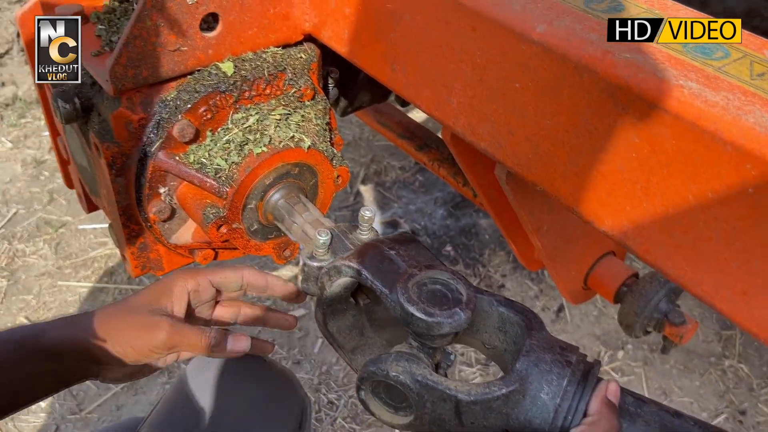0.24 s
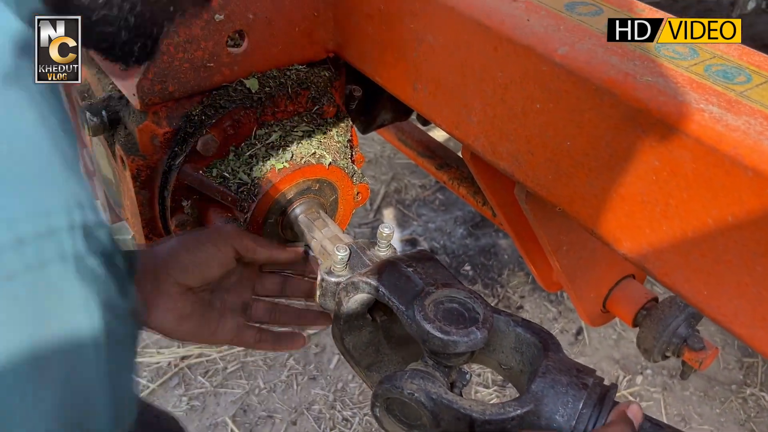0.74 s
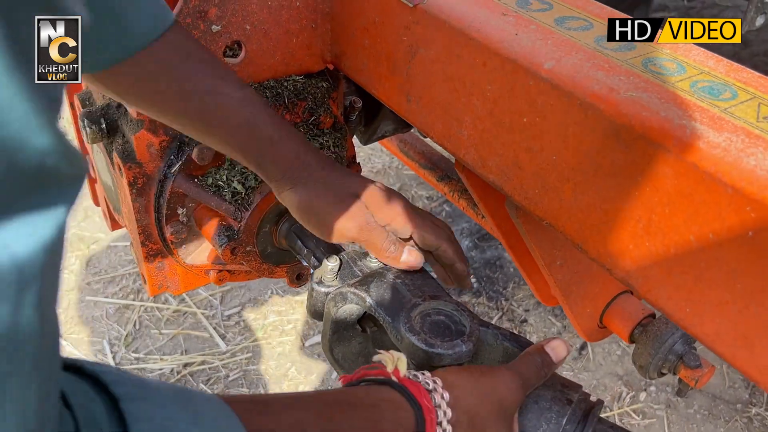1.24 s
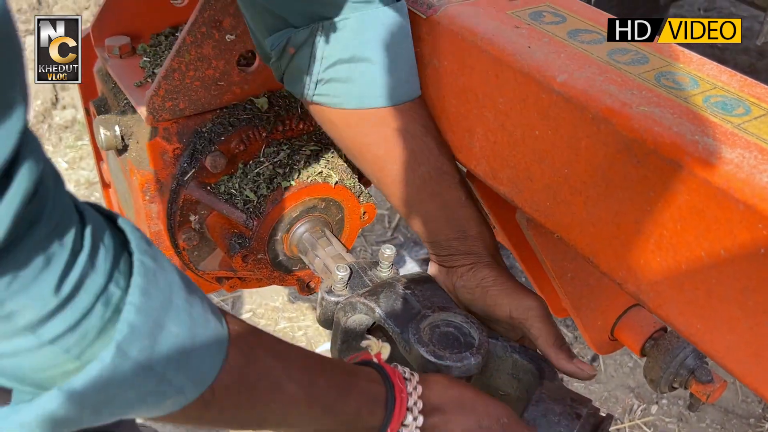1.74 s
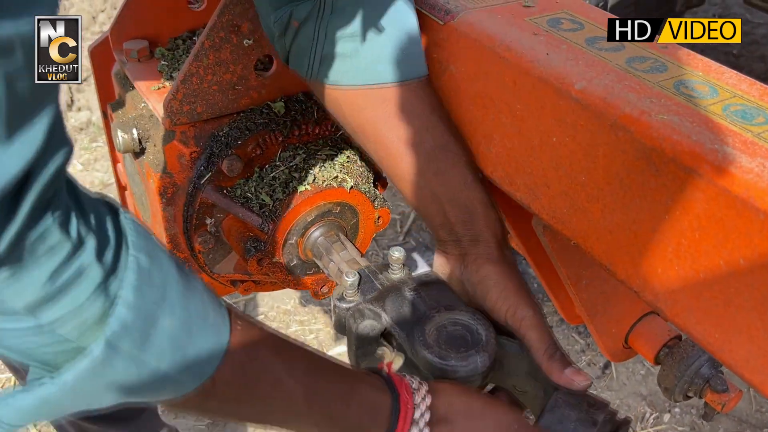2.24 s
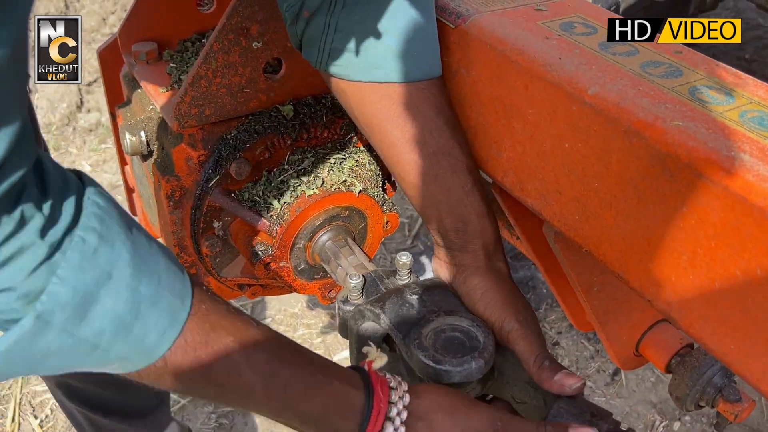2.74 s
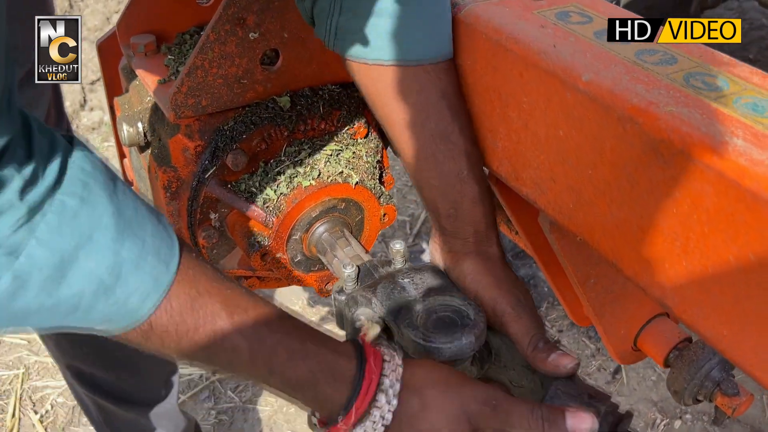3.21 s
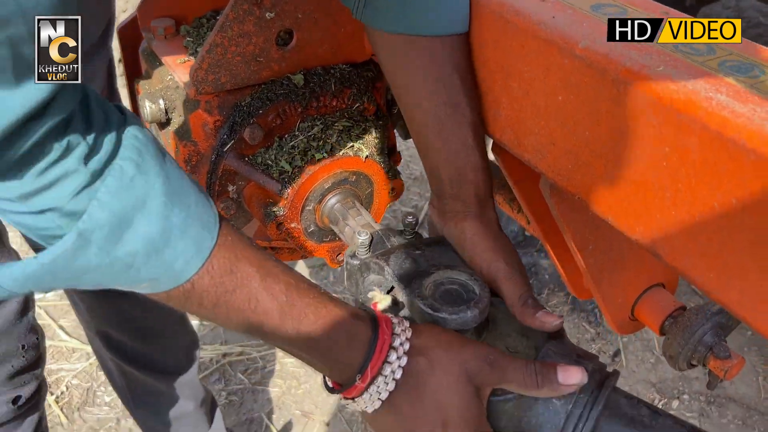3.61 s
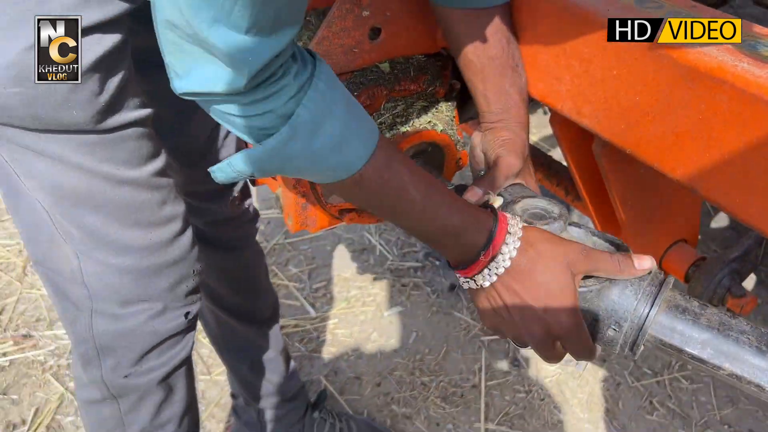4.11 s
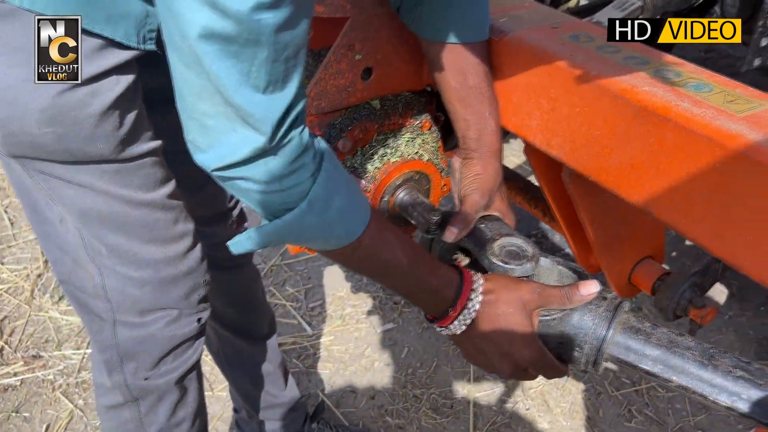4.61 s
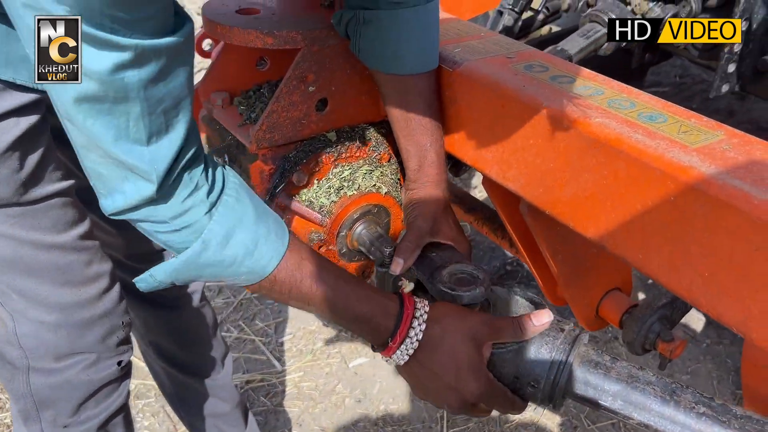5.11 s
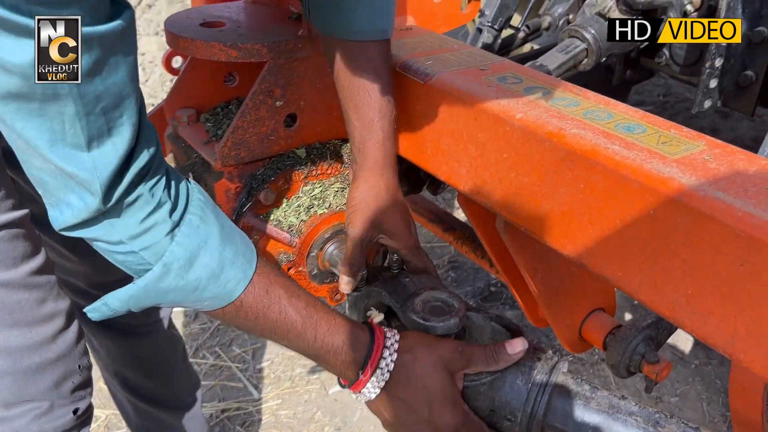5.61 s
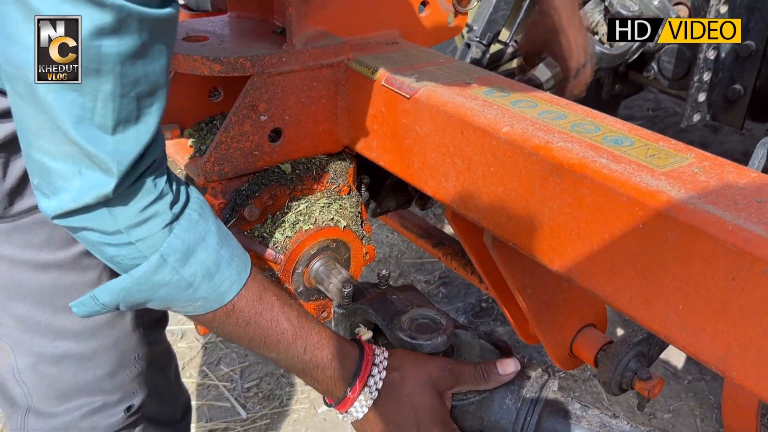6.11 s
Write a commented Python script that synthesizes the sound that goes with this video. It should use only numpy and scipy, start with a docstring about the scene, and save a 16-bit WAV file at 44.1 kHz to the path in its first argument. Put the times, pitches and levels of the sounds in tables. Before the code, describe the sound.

Close up outdoors, a heavy steel coupling is worked onto a machine's shaft. Two early clanks and a rasp come first, then cloth brushes the microphone and a shoe scuffs dry dirt. From just past two seconds, dense clanks, scrapes and rattles follow, with a dull frame boom and short tube ring. They thin out to separate knocks, and wind thumps grow at the end.

```python
"""Steel yoke on a splined shaft

A heavy drive-shaft yoke is jiggled onto a farm machine's splined input shaft, outdoors and close up.
Each contact is a short dead clank of noise and damped modes; the machine's frame hums and the hollow shaft sings.
Between clanks, clumped noise makes the splines scrape, and random clicks make them rattle.
Shaped noise gives rustling clothes, cloth brushing the microphone, a shoe scuffing dirt and thumping wind.
"""
import sys
import numpy as np
from scipy import signal
from scipy.fft import rfft, irfft, next_fast_len
from scipy.io import wavfile
from scipy.ndimage import map_coordinates

SR = 44100
rng = np.random.default_rng(int(sys.argv[2]) if len(sys.argv) > 2 else 0)


def pcm_store(signal):
    """Save signal as 16-bit PCM."""
    levels = np.round(np.clip(np.atleast_2d(signal), -1, 1) * 32767)
    wavfile.write(sys.argv[1], SR, levels.astype(np.int16).T)


N = 280035

# slowly changing breeze under the gusts [t/s, level/dB]
BREEZE_LEVEL = [(0.0, -44.5), (1.22, -49.5), (1.73, -58), (3.48, -45), (4.16, -48.5), (4.47, -44.5),
                (5.02, -44.5), (5.43, -40), (5.64, -43), (6.35, -35.5)]
# gusts riding on the breeze [t/s, length/s, level/dB]
GUST_SWELLS = [(.17, 0.16, -43), (.8, 0.088, -41.5), (1.06, 0.22, -44), (1.45, 0.21, -49.5),
               (2.36, 0.066, -37.5), (2.57, .11, -47.5), (3.08, 0.062, -44.5), (3.3, 0.092, -41),
               (3.62, 0.14, -48), (4.24, 0.065, -42), (4.41, 0.075, -40.5), (4.55, 0.16, -35.5),
               (5.15, 0.059, -38), (5.28, 0.063, -33), (5.43, 0.28, -37.5), (5.99, 0.071, -31.5),
               (6.16, 0.1, -35.5)]
# single puffs of air on the microphone [t/s, peak level/dB, f/Hz]
AIR_PUFFS = [(0.832, -24.5, 290), (1.117, -29, 265), (5.29, -23.5, 67), (5.312, -23.5, 75.8),
             (5.447, -22, 90), (6.025, -15, 128), (6.055, -25, 183), (6.081, -17.5, 81), (6.214, -27, 293),
             (6.229, -11.5, 74), (6.274, -16.5, 94)]
# colour of the wind eddies [f/Hz, relative level/dB]
WIND_COLOUR = [(12, -40), (20, -20), (50, 2.5), (81, 2.5), (123, -1), (215, -10.5), (357, -25.5),
               (433, -36.5), (476, -32.5), (743, -59), (900, -59.5), (1170, -78), (1980, -120)]
# colour of the quiet open air [f/Hz, relative level/dB]
AIR_COLOUR = [(12, -44), (20, -6.5), (59, -2), (157, -9), (342, -13), (465, -27), (534, -18.5),
              (767, -26.5), (5380, -52.5), (7310, -54), (9930, -53), (12800, -49.5), (15500, -64)]
EDDY_DB, GUSTY_DB, GUSTS_PER_S = -0.5, 1, 14  # eddy gain; depth and rate (knots per s) of their swells

# the worker's movements rustle a shirt [t/s, length/s, level/dB]
SHIRT_MOVES = [(.83, 0.23, -75.5), (1.0, 0.56, -84.5), (1.38, 0.76, -72), (2.22, 0.14, -58.5),
               (2.38, 0.5, -72), (3.42, 0.1, -68.5), (3.65, 0.42, -73.5), (4.12, 0.096, -60),
               (4.24, 0.13, -76), (4.97, 0.12, -74), (5.5, .42, -87), (5.95, 0.25, -75.5)]
# cloth brushes the microphone [t/s, length/s, level/dB]
CLOTH_BRUSHES = [(.2, 0.33, -41.5), (.795, 0.083, -42), (.96, 0.023, -36), (1.025, .12, -35),
                 (1.21, 0.072, -44.5), (1.5, 0.12, -52.5)]
# colour of rustling cloth [f/Hz, relative level/dB]
CLOTH_COLOUR = [(350, -56.5), (600, -10), (788, -6.5), (1470, -6), (2470, -8), (2950, -10), (6950, -18.5),
                (8520, -17), (9890, -36.5), (11300, -20.5), (13200, -22), (14500, -22), (15500, -71.5)]
# colour of cloth brushing lightly [f/Hz, relative level/dB]
BRUSH_COLOUR = [(40, -32), (70, -6), (150, 4.5), (260, -3.5), (500, -10), (800, -53.5), (1400, -60.5),
                (4000, -120)]
# colour added by firm brushing [f/Hz, relative level/dB]
FLUTTER_COLOUR = [(100, -14.5), (250, 1), (450, 1.5), (700, -6.5), (950, -27), (1400, -47.5), (4000, -110)]
STILL_DB = -87  # shirt between movements, ahead of the rustle's own gain

# sliding strokes of steel on steel, after a faint opening rustle [t/s, length/s, level/dB]
SLIDE_STROKES = [(0.0, 0.029, -53.5), (.155, 0.049, -37.5), (2.18, 0.14, -46), (2.26, 0.16, -43.5),
                 (2.47, 0.069, -50.5), (2.735, 0.039, -37.5), (3.41, 0.092, -42.5), (3.645, 0.037, -43),
                 (3.79, 0.063, -51), (3.845, 0.0562, -43.5), (4.475, 0.088, -50.5), (4.745, 0.027, -43.5),
                 (4.865, 0.033, -58), (5.405, 0.079, -40.5), (5.58, 0.079, -41), (5.96, 0.031, -60.5)]
# colour of steel scraping [f/Hz, relative level/dB]
SCRAPE_COLOUR = [(150, -23), (350, -0.5), (560, 3), (900, -2.5), (1500, -1.5), (2400, -5), (4000, -20.5),
                 (7500, -34.5), (9900, -52.5), (11500, -40.5), (14000, -42.5), (15500, -67)]
# yoke modes, damped by hands and grease [f/Hz, level/dB, t60/s]
YOKE_MODES = [(900, 6.5, 0.089), (1215, 3, 0.1), (1392, 0, 0.12), (1660, -8, 0.053), (1790, -4.5, 0.16),
              (2154, -5.5, .13), (2384, -7, .13), (2676, -6, .09), (3130, -14.5, 0.15), (3440, -15, 0.098),
              (3780, 2.5, 0.053), (3951, -5, .07), (4620, -16, 0.1), (5070, -18.5, .06), (5720, -12, .08),
              (6230, -14.5, 0.043), (6510, -13.5, 0.058), (7300, -16, 0.096), (7420, -13, 0.08),
              (7630, -19, 0.076), (8800, -26, 0.07), (11720, -21, .08), (13710, -34, .06)]
# sliding strokes of shoes and cloth [t/s, length/s, level/dB]
SHOE_SCUFFS = [(.84, .1, -51), (1.385, 0.095, -46), (1.45, 0.11, -45), (1.985, 0.033, -49),
               (2.03, 0.086, -57), (4.97, 0.056, -76), (5.04, 0.077, -72)]
# colour of a sole on dry soil [f/Hz, relative level/dB]
DIRT_COLOUR = [(150, -1.5), (500, -2), (1400, -3), (2500, -8), (4500, -21), (7500, -24.5), (9900, -41),
               (12000, -36), (14000, -40), (15500, -57)]
# clicks while something slides: rate, level relative to the stroke, scatter of that level
RATTLE_PER_S, RATTLE_DB, RATTLE_SCATTER_DB = 29, -11, 10

# yoke meets shaft [t/s, clank level/dB at 2-6 kHz, knock relative to clank/dB, edge relative to clank/dB]
YOKE_CONTACTS = [(0.1446, -49.5, 4.5, -20), (.167, -37, -5, -18.5), (0.227, -52.5, 5.5, -35),
                 (.333, -62.5, 13, -41), (.403, -30.5, -1.5, -29.5), (0.999, -66.5, -4, -16),
                 (2.236, -58.5, 2, -44), (2.2796, -40, 3, -69), (2.3767, -36.5, -1, -18.5),
                 (2.567, -33.5, 5.5, -22.5), (2.747, -38.5, 7, -45), (2.8181, -27.5, -5.5, -38),
                 (2.828, -45.5, 5.5, -14), (3.0561, -31, -3, -41), (3.2076, -52.5, 3.5, -23),
                 (3.234, -45.5, 5, -26), (3.242, -38.5, -0.5, -24.5), (3.251, -40, 1, -28),
                 (3.283, -51.5, 6.5, -38), (3.438, -47, -7, -33), (3.465, -46.5, 2, -38),
                 (3.638, -48.5, 1.5, -20), (3.665, -41, 3, -19.5), (3.681, -39, 0, -25),
                 (3.712, -45.5, 0.5, -22), (3.7225, -35, -1, -21.5), (3.824, -48.5, -0.5, -33),
                 (3.849, -48, -0.5, -32), (3.8666, -38.5, -5, -24.5), (3.9891, -49, -5, -25),
                 (4.021, -56, 8.5, -16), (4.257, -66, 8.5, -8.5), (4.5094, -42.5, 4.5, -39),
                 (4.5664, -29, -3, -15), (4.7711, -29.5, -6, -32), (5.3737, -57, 2, -22),
                 (5.3937, -40, -0.5, -18.5), (5.425, -44, 4, -46), (5.5476, -58, 7, -20),
                 (5.5769, -52.5, 0, -33), (5.655, -41, -3.5, -20), (5.7972, -63, 4.5, -18),
                 (5.8666, -62, 3.5, -25), (6.141, -61.5, -1.5, -12), (6.2577, -67.5, 8, -12)]
# colour of the dense clank [f/Hz, relative level/dB]
CLANK_COLOUR = [(100, -15), (400, 1.5), (1300, 7), (3000, -7), (4000, -4), (5500, -9.5), (7400, -15),
                (8300, -24), (9800, -33), (11500, -27.5), (14300, -28.5), (15800, -44.5)]
FIRM_DB = -40  # clank level of a firm contact
CHATTER_S, CHATTER_SPREAD = 0.001, 0.34  # usual rebound time; its scatter in octaves
BRIGHTER = 0.048  # harder blows lean towards the top of the clank: dB of tilt per dB

# gearbox and frame modes [f/Hz, level/dB, t60/s]
FRAME_MODES = [(198, -6, 0.12), (254.5, -3.5, 0.51), (277, -2.5, 0.91), (330, 5, 0.4), (417.7, -15.5, 0.93),
               (528.4, -9, 0.45), (601.4, -8, 0.49), (694, -25, 0.25), (833, -16.5, 0.39),
               (867, -22.5, 0.13), (1051, -9, 0.37), (1170, -22, 0.21), (1450, -27.5, 0.31)]
# colour of the booming frame panels [f/Hz, relative level/dB]
BOOM_COLOUR = [(40, -32), (80, 1), (150, 4), (300, 7), (450, -1.5), (700, -9.5), (1500, -24), (3000, -36.5),
               (6000, -50), (12000, -68.5)]
# how well blows pass into the frame as the yoke bears on the shaft [t/s, level/dB]
YOKE_BEARING = [(.3, -0.5), (2.28, -4.5), (2.57, 7), (2.82, -2), (3.7, -0.5), (3.87, 2), (4.6, 6.5),
                (5.6, 5.5), (6.2, -3.5)]
BOOM_DB, BOOM_GROWS = -44, 0.43  # frame drive at a firm contact, before bearing; its dB per dB of clank

# hollow shaft tube modes [f/Hz, level/dB, t60/s]
TUBE_MODES = [(686, -4.5, 0.35), (787, -5.5, 0.53), (1040, -8.5, .5), (1014, -3.5, 0.84), (1297, -18, 0.71),
              (1448, -7.5, .25), (1518, -9.5, 0.7), (2008, -13, .35), (2740, -20.5, 0.39)]
# how freely the grip lets the tube ring [t/s, level relative to the knock/dB]
GRIP_LOOSENESS = [(.4, -27), (2.37, -27), (2.57, -15), (2.75, -21), (3.7, -22), (4.55, -28)]
# pings of the spring-loaded lock pin [t/s, level/dB]
PIN_PINGS = [(2.748, -47), (4.512, -43.5), (6.164, -61)]

# stereo balance [f/Hz, left minus right level/dB]
LEFT_BALANCE = [(60, 8.5), (110, 7.5), (200, 10), (380, 11.5), (700, 8.5), (1290, 8.5), (2380, 5.5),
                (4400, 5), (8120, 6), (15000, 5.5)]
# scattered sound [f/Hz, level/dB]
SCATTER_WIDTH = [(60, -24), (250, -21), (600, -7.5), (1200, -10), (2500, -28.5), (12000, -8.5)]
TOP_HZ = 15800  # band limit, at half gain


def amp(db):
    """Decibels to gain."""
    return 10 ** (np.asarray(db) / 20)


def unit(x):
    """Scale to rms 1."""
    return x / np.sqrt(np.mean(x ** 2) + 1e-20)


def along(points, hz):
    """Read (f/Hz, value) points on a log frequency axis."""
    f, v = np.transpose(points)
    return np.interp(np.log(hz + 1), np.log(f + 1), v)


def colour_gain(points):
    """Turn (f/Hz, level/dB) points into a gain as a function of frequency."""
    return lambda hz: amp(along(points, hz))


def level(rows):
    """Gain per sample from (t/s, level/dB) rows."""
    return amp(np.interp(np.arange(N) / SR, *np.transpose(rows)))


def wobble(rate):
    """A smooth random curve with rate knots a second."""
    knots = rng.standard_normal(int(N * rate / SR) + 4)
    return map_coordinates(knots, [np.arange(N) * rate / SR])


def clock(seconds):
    """Sample times from zero, in seconds."""
    return np.arange(int(seconds * SR)) / SR


def fade(t, t60):
    """Exponential decay, 60 dB in t60 seconds."""
    return np.exp(-np.log(1000) * t / t60)


def onset(t, rise_s):
    """Exponential approach to full level with time constant rise_s."""
    return 1 - np.exp(-t / rise_s)


def filtered(x, response):
    """Multiply the spectrum of x by a response of frequency."""
    n = x.shape[-1]
    m = next_fast_len(n + 4096)
    return irfft(rfft(x, m) * response(np.fft.rfftfreq(m, 1 / SR)), m)[..., :n]


def noise(spectrum, size=N):
    """Coloured noise of rms 1."""
    return unit(filtered(rng.standard_normal(size), colour_gain(spectrum)))


def ring(modes, t, scatter_db):
    """Sum decaying sine modes, with fresh random strengths and phases."""
    hz, db, t60 = np.transpose(modes)[:, :, None]
    strength = amp(db + scatter_db * rng.standard_normal(hz.shape))
    cycles = hz * t + rng.random(hz.shape)
    return np.sum(strength * fade(t, t60) * np.sin(2 * np.pi * cycles), 0)


def add(track, s, sound):
    """Mix a sound into a track at time s."""
    start = max(round(s * SR), 0)
    part = sound[:max(N - start, 0)]
    track[start:start + len(part)] += part


def strike_level(x):
    """Rms of a short sound, its energy spread over 20 ms."""
    return np.sqrt(np.sum(x ** 2) / (0.02 * SR))


def swells(rows, attack_s, release_s):
    """Gain per sample of (t/s, length/s, level/dB) gestures: each rises, holds and dies away."""
    t = np.arange(N) / SR
    out = np.zeros(N)
    for s, length, db in rows:
        rise = (1 + np.tanh((t - s) / attack_s)) / 2
        fall = (1 - np.tanh((t - s - length) / release_s)) / 2
        out += amp(db) * rise * fall
    return out


def pressure(rows):
    """Gain per sample of (t/s, length/s, level/dB) sliding strokes, each a rounded arch."""
    out = np.zeros(N)
    for s, length, db in rows:
        add(out, s, amp(db) * np.sqrt(np.abs(np.hanning(int(length * SR)))))
    return out


def strokes(rows, spectrum, grit_db):
    """Friction: a clumped stream of tiny catches, a few of them sharp, under the swell of each stroke."""
    clumps = amp(grit_db * wobble(500) + 4 * wobble(70))
    catches = unit(rng.standard_normal(N) * clumps)
    t = clock(0.01)
    snap = rng.standard_normal(len(t)) * fade(t, 0.003)
    impulses = (rng.random(N) < 180 / SR) * rng.uniform(0.22, 1, N)  # about 180 snags a second
    snags = unit(signal.fftconvolve(impulses, snap)[:N])
    grain = unit(filtered(catches + 0.44 * snags, colour_gain(spectrum)))
    return pressure(rows) * grain


def wind():
    """Low turbulent eddies swell on the microphone, with single puffs, over quiet open air."""
    strength = level(BREEZE_LEVEL) + swells(GUST_SWELLS, attack_s=0.031, release_s=0.027)
    eddies = amp(EDDY_DB + GUSTY_DB * wobble(GUSTS_PER_S)) * noise(WIND_COLOUR)
    out = strength * eddies + amp(-62.5) * noise(AIR_COLOUR)
    t = np.arange(-SR // 25, SR // 25) / SR
    for s, db, hz in AIR_PUFFS:
        u = (np.pi * hz * t) ** 2
        puff = (2 * u - 1) * np.exp(-u)  # one push and its recoil
        add(out, s + t[0], amp(db) * puff)
    return out


def clothes():
    """A shirt rustles softly; brushing the microphone it flutters dully, brighter the firmer it presses."""
    motion = amp(STILL_DB) + swells(SHIRT_MOVES, attack_s=0.066, release_s=0.019)
    rustle = motion * noise(CLOTH_COLOUR) * amp(3.0 + 1.9 * wobble(90))
    touch = swells(CLOTH_BRUSHES, attack_s=0.02, release_s=0.024)
    press = touch * unit(amp(4.4 * wobble(70)))
    brush = press * noise(BRUSH_COLOUR)
    # the flutter grows faster than the touch
    flutter = press * touch / touch.max() * noise(FLUTTER_COLOUR)
    return rustle + amp(1.5) * brush + amp(-4.0) * flutter


def splines():
    """After a faint opening rustle, sliding splines rasp by friction; the rasp faintly excites the yoke."""
    rasp = strokes(SLIDE_STROKES, SCRAPE_COLOUR, grit_db=5.5)
    yoke = ring(YOKE_MODES, clock(0.2), scatter_db=0)
    resonance = signal.fftconvolve(rasp, yoke / np.linalg.norm(yoke))[:N]
    return rasp + amp(-19) * resonance


def ticks():
    """Loose play and grit click at random during the strokes, louder the harder they press."""
    t = clock(0.1)
    sliding = pressure(SLIDE_STROKES) + amp(-20.5) * pressure(SHOE_SCUFFS)
    happens = rng.random(N) < RATTLE_PER_S / SR
    size_db = RATTLE_DB + RATTLE_SCATTER_DB * rng.standard_normal(N)
    strength = happens * amp(size_db) * sliding
    out = np.zeros(N)
    for i in np.flatnonzero(strength):
        click = noise(CLANK_COLOUR, size=len(t)) * fade(t, 0.068) * onset(t, 0.00057)
        add(out, i / SR, strength[i] * click / strike_level(click))
    return out


def voiced(hit, band_dbs):
    """Set the knock, clank and edge of a blow: they depend on where and how hard the steel meets."""
    now = []
    for band in [(600, 2000), (2000, 6000), (8500, 15000)]:  # knock, clank, edge in Hz
        sos = signal.butter(4, band, "band", fs=SR, output="sos")
        now.append(strike_level(signal.sosfilt(sos, hit)))
    knock, clank, edge = np.array(band_dbs) - 20 * np.log10(now)
    tilt = BRIGHTER * (band_dbs[1] - FIRM_DB)
    shape = [(1500, knock), (2600, clank - tilt), (4500, clank + tilt), (9500, edge)]
    size = 2 * len(hit)
    gain = amp(along(shape, np.fft.rfftfreq(size, 1 / SR)))
    # minimum phase by folding the cepstrum: the filter adds nothing ahead of the blow
    cepstrum = irfft(np.log(gain))
    cepstrum[1:size // 2] *= 2
    cepstrum[size // 2 + 1:] = 0
    return irfft(rfft(hit, size) * np.exp(rfft(cepstrum)))[:len(hit)]


def clanks():
    """Each contact is a short noise swell, a dense short crack and the yoke's modes, with tiny rebounds."""
    out, t = np.zeros(N), clock(0.25)
    swell = np.linspace(0, 1, round(0.011 * SR)) ** 1.5
    for s, db, knock_db, edge_db in YOKE_CONTACTS:
        chatter = CHATTER_S * 2 ** (CHATTER_SPREAD * rng.standard_normal())
        dense = noise(CLANK_COLOUR, size=len(t)) * (fade(t, 0.031) + 0.25 * fade(t, 0.066))
        # every contact point also wakes a few short-lived modes of its own
        pitches = rng.uniform(900, 8000, size=14)
        local = ring([(hz, along(CLANK_COLOUR, hz), 0.055) for hz in pitches], t, scatter_db=2.5)
        yoke = ring(YOKE_MODES, t, scatter_db=3.5)
        body = (dense + amp(-15) * local + amp(-23.5) * yoke) * onset(t, 0.0003)
        hit = body.copy()
        # four rebounds of random delay, size and polarity
        for when, size in rng.random((4, 2)):
            lag = int((0.15 + when) * 2 * chatter * SR) + 1
            rebound = (size - 0.5) * 2 * min(chatter / 0.0017, 1.2)
            hit[lag:] += rebound * body[:-lag]
        add(out, s, voiced(hit, [db + knock_db, db, db + edge_db]))
        # a faint 11 ms noise swell leads into each contact
        lead_in = swell * noise(SCRAPE_COLOUR, size=len(swell))
        add(out, s - len(swell) / SR, amp(db - 7) * lead_in)
    return out


def frame():
    """Blows travel through the gearbox; the sheet-steel frame swells, booms and rings on."""
    out, t = np.zeros(N), clock(1)
    for s, db, _, _ in YOKE_CONTACTS:
        bearing_db = np.interp(s, *np.transpose(YOKE_BEARING))
        boom_db = BOOM_DB + BOOM_GROWS * (db - FIRM_DB) + bearing_db
        panels = noise(BOOM_COLOUR, size=len(t)) * fade(t, 0.39) * onset(t, 0.019)
        modes = ring(FRAME_MODES, t, scatter_db=4.5) * onset(t, 0.011)
        add(out, s, amp(boom_db) * (amp(6.5) * panels + amp(-1.5) * modes))
    return out


def tube():
    """The hollow shaft sings after each knock as the grip allows; shifting hands make its ring waver."""
    out, t = np.zeros(N), clock(1)
    for s, db, knock_db, _ in YOKE_CONTACTS:
        ring_db = db + knock_db + np.interp(s, *np.transpose(GRIP_LOOSENESS))
        modes = ring(TUBE_MODES, t, scatter_db=0.5) * onset(t, 0.004)
        add(out, s, amp(ring_db) * modes)
    return out * amp(2.3 * wobble(15))


def scuffs():
    """Shoe and cloth strokes are friction noise with the colour of a sole on dry soil."""
    return strokes(SHOE_SCUFFS, DIRT_COLOUR, grit_db=3.5)


def lock_pin():
    """The small spring-loaded pin rings with one high decaying note."""
    out, t = np.zeros(N), clock(0.25)
    ping = np.sin(2 * np.pi * 7150 * t) * fade(t, 0.11) * onset(t, 0.0015)
    for s, db in PIN_PINGS:
        add(out, s, amp(db) * ping)
    return out


def stereo(x):
    """The left is favoured; sound scattered by ground and machine enters the two sides in opposite phase."""
    t = clock(0.1)
    walls = rng.standard_normal(len(t)) * fade(t, 0.11) * (t > 0.003)
    diffuse = signal.fftconvolve(x, walls / np.linalg.norm(walls))[:N]
    scattered = filtered(diffuse, colour_gain(SCATTER_WIDTH))
    # tanh of half the log ratio gives exactly the tabled left/right balance
    lean = filtered(x, lambda hz: np.tanh(np.log(amp(along(LEFT_BALANCE, hz))) / 2))
    return np.array([x + lean + scattered, x - lean - scattered])


def scene():
    """Mix weather, worker and steel, then spread them in stereo."""
    worker = clothes() + scuffs()
    steel = splines() + ticks() + clanks() + frame() + tube() + lock_pin()
    return stereo(wind() + worker + steel)


def record(dry):
    """A very steep low-pass removes the treble above the band limit."""
    return filtered(dry, lambda hz: 1 / (1 + (hz / TOP_HZ) ** 80))


dry = scene()
out = record(dry)
pcm_store(out)
```